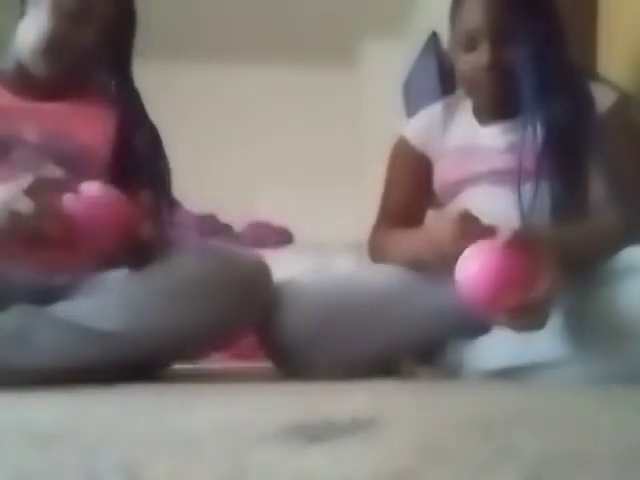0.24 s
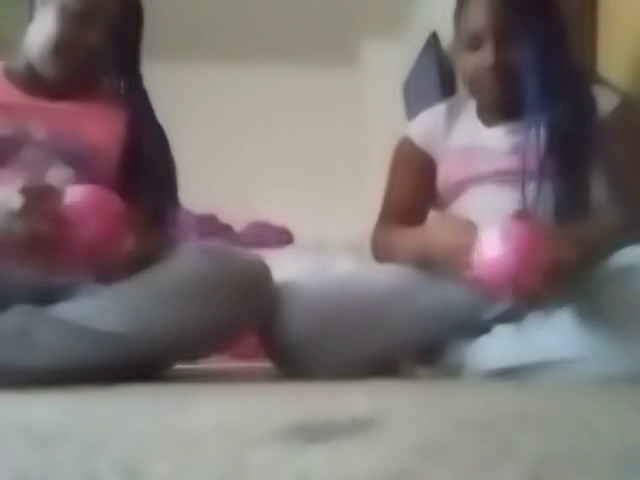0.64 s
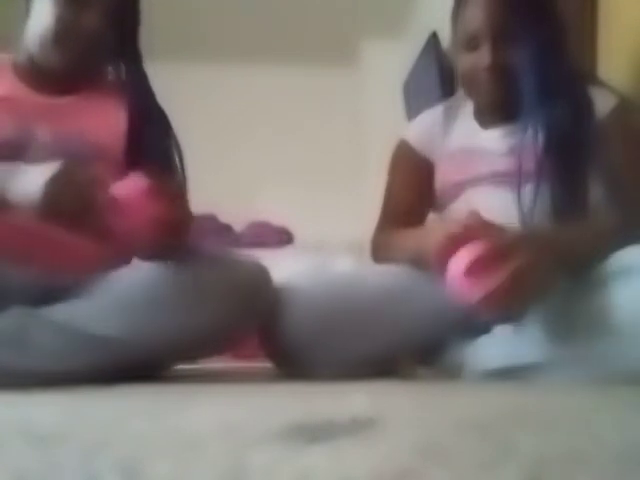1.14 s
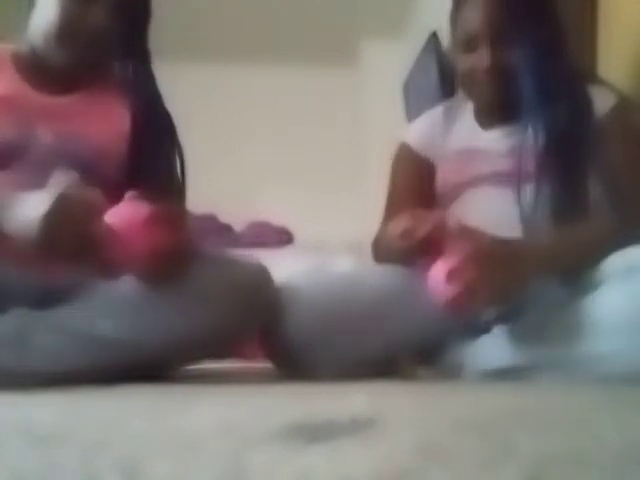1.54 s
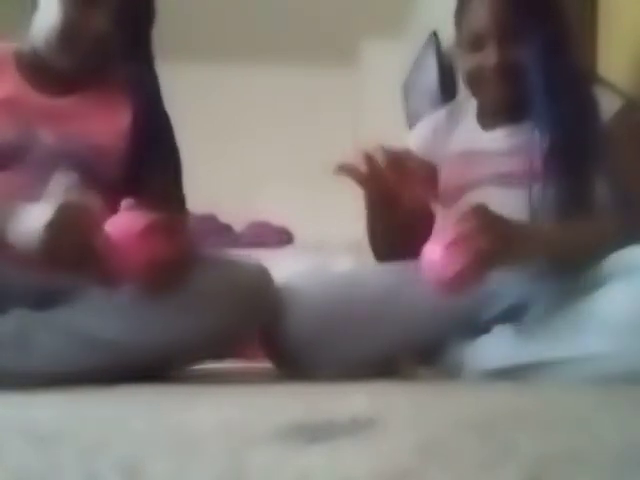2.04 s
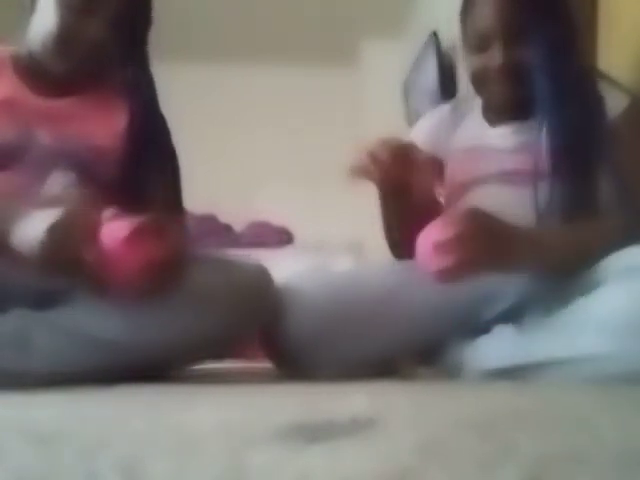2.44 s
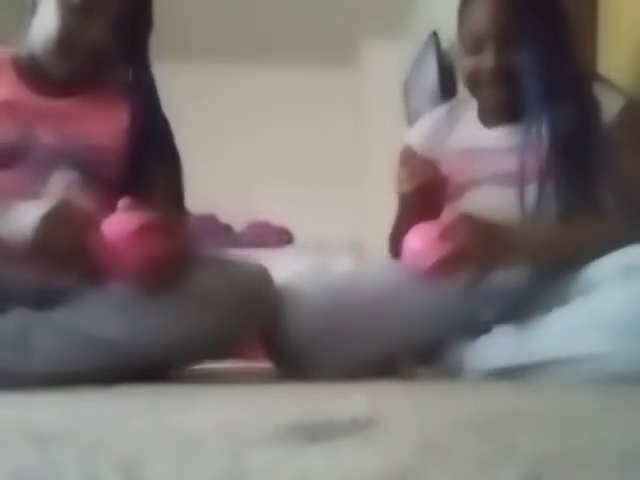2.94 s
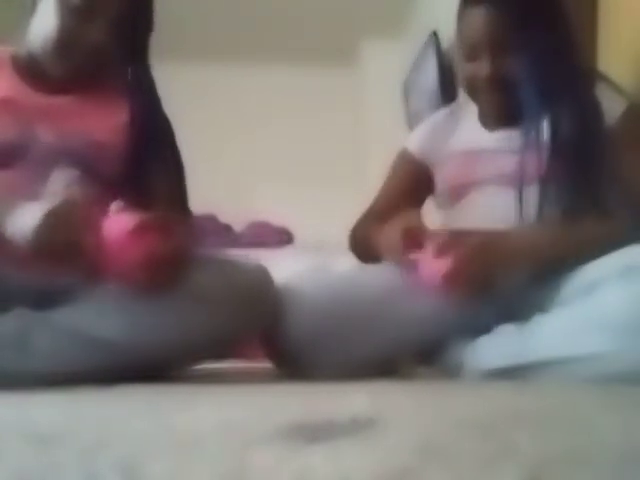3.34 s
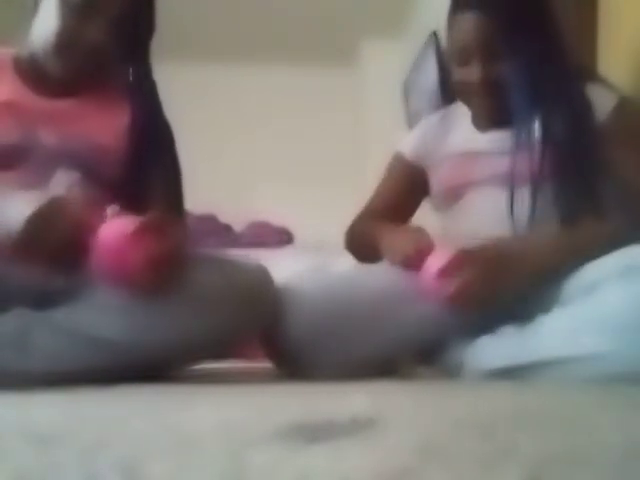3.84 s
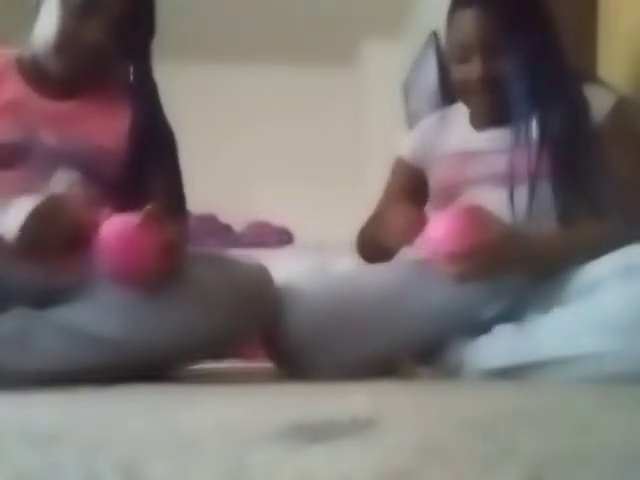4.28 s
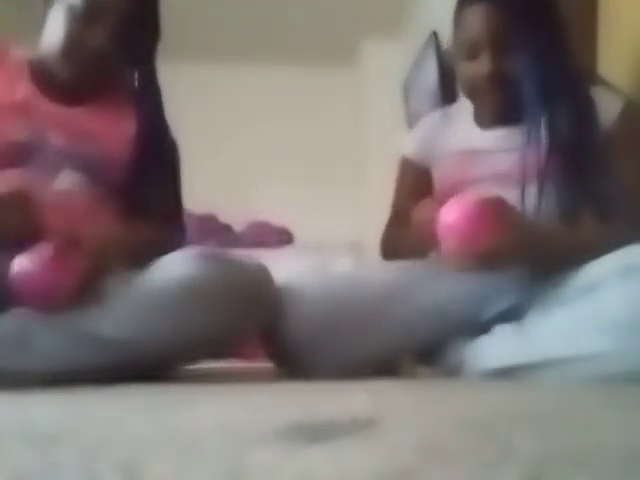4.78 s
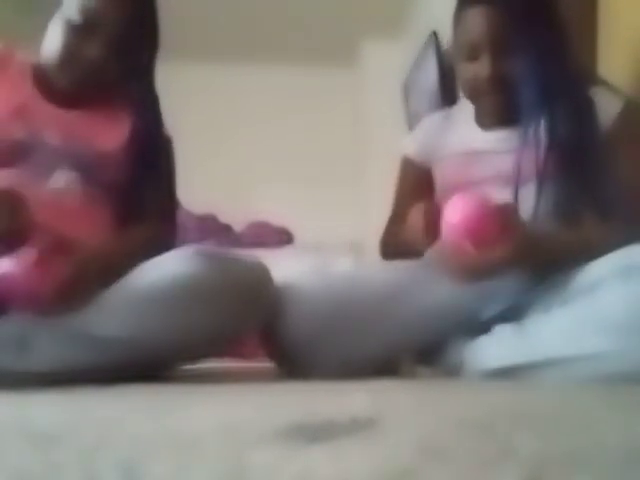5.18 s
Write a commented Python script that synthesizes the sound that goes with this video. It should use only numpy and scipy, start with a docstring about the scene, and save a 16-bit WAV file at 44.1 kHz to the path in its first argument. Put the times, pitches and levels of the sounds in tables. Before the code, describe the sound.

Close handling of stiff plastic film on hollow toy balls, in a small carpeted room with a short diffuse tail. A snap is already ringing at the start; a tight, sharp pair of crackles follows at 0.35-0.4 s. Lighter crinkles and ticks run from 0.6 to 1.2 s, then firmer snaps at 1.4 and 1.6 s and a very bright, hard crack at 1.75 s. It falls almost silent around 2-2.4 s, with only faint high blips. A dull hollow knock with softer crackle lands near 2.58 s, and a lone click at 2.93 s. The densest burst snaps at 3.35-3.5 s, followed by small crinkles through 4.7 s. Strong snaps return at 4.8 and 4.95 s, tapering into light clicks until about 5.4 s. Low rumble and mains hum swell unevenly beneath thin hiss that noise reduction pulls down in the gaps.

```python
"""Peeling film off hollow balls

Hands peel stiff plastic film off hollow toy balls in a small carpeted room, close to a small microphone.
Each crease snaps over in milliseconds: a burst of slips rings ball and film modes and excites the room.
Dull knocks and faint high blips are single damped modes; the creeping film is random ticks. Low rumble and
mains hum come through in surges over a thin hiss; a noise suppressor thins quiet bands above 200 Hz."""
import sys
import numpy as np
from scipy import signal
from scipy.fft import rfft, irfft
from scipy.io import wavfile
from scipy.ndimage import uniform_filter1d

SR = 44100
rng = np.random.default_rng(int(sys.argv[2]) if len(sys.argv) > 2 else 0)


def master_out(mix):
    """Clip the mix to full scale and print it as 16-bit PCM to the path in sys.argv[1]."""
    frames = np.transpose(np.atleast_2d(mix))
    ceiling = np.clip(frames, -1, 1)
    pcm = np.round(ceiling * 32767).astype(np.int16)
    wavfile.write(sys.argv[1], SR, pcm)


N = 238800
LEAD = 4410  # samples computed ahead of time zero, so that an earlier snap still rings
RING_SAMPLES, SLIP_SAMPLES = 2048, 700
SNAP_SAMPLES = RING_SAMPLES + SLIP_SAMPLES - 1

# Modes a snap rings with: five bands from low (the ball) to high; the top two are mostly the microphone port.
# Each row: frequency in Hz, damping in Hz (decay rate over 2 pi), level in dB within its band.
RING_MODES = [
    [(290, 32, -5), (498, 23, 3.5), (655, 160, 15)],
    [(1030, 120, -2), (1195, 100, 8), (1635, 130, 4.5)],
    [(2433, 420, 3), (2905, 130, 4), (3790, 100, 6)],
    [(4320, 300, -6.5), (5266, 620, -2.5), (6125, 906, 5.5), (6640, 1300, -15)],
    [(9710, 1200, 2.5), (11250, 1600, -4.5), (13800, 1500, -5.5)],
]


def amp(db):
    """Level definition: 20 dB is a factor of ten in amplitude."""
    return 10 ** (np.asarray(db) / 20)


def evened(x):
    """Power normalization: scales a signal to rms 1."""
    return x / np.sqrt(np.mean(x ** 2) + 1e-20)


def read(points, hz):
    """Spectral interpolation: reads a (Hz, value) curve along a logarithmic frequency axis."""
    f, value = np.transpose(points)
    return np.interp(np.log(hz + 1), np.log(f + 1), value)


def coloured(points):
    """Spectral shaping: filters white noise to a given spectrum, steady and of rms 1."""
    hz = np.fft.rfftfreq(N, 1 / SR)
    spectrum = rfft(rng.standard_normal(N)) * amp(read(points, hz))
    return evened(irfft(spectrum, N))


def ring(modes, detune):
    """Modal superposition: damped sines whose soft start keeps each band out of its neighbours."""
    t = np.arange(RING_SAMPLES) / SR
    total = np.zeros(RING_SAMPLES)
    for (hz, damping, db), factor in zip(modes, detune):
        envelope = np.sqrt(damping) ** 3 * t * np.exp(-2 * np.pi * damping * t)  # same energy at any damping
        total += amp(db) * envelope * np.sin(2 * np.pi * hz * factor * t)
    return total


def crease_slips(grit_db=9.5):
    """Snap-through buckling: a quick run of tiny slips of uneven size that dies away."""
    decay_ms, decay_spread_db = 3.0972, 4
    t_ms = np.arange(SLIP_SAMPLES) / SR * 1000
    decay_ms = decay_ms * amp(decay_spread_db * rng.standard_normal())
    slips = rng.standard_normal(SLIP_SAMPLES) * amp(grit_db * rng.standard_normal(SLIP_SAMPLES))
    slips *= np.exp(-t_ms / decay_ms)
    slips *= 1 + 0.31 * np.exp(-t_ms / 0.069)
    return slips * np.clip(t_ms / 1.2, 0, 1)  # 1.2 ms onset


def snap(s, energy_db, ball_db, film_db, film_hz, detune_spread=0.049):
    """Source-resonator coupling: slips ring ball, film and treble, each with its own share of the energy.

    Returns the sound toward the microphone and, smooth in colour, the average over all directions."""
    # Treble above 8 kHz in a 0 dB snap. Each row: time in seconds, level in dB against 4-8 kHz.
    treble_share = [(0, -3), (.35, -7.5), (.6, -7), (1.0, -4.5), (1.6, -3.5), (1.74, -9.5), (2.5, -8),
                    (3.4, -4), (3.6, -9.5), (4.2, -7), (4.7, -5.5), (5.0, -8), (5.36, -14.5), (5.39, -2)]
    treble_per_db = 0.02  # dB of treble share gained per dB of snap energy
    film_slope = -12.5  # dB per octave away from the film pitch
    slips = crease_slips()
    film_modes = [(hz, damping, db + film_slope * abs(np.log2(hz / film_hz)))
                  for hz, damping, db in RING_MODES[1] + RING_MODES[2]]
    treble_db = np.interp(s, *np.transpose(treble_share)) + treble_per_db * energy_db
    bands = (RING_MODES[0], film_modes, RING_MODES[3], RING_MODES[4])
    shares_db = (ball_db, film_db, 0, treble_db)
    out = np.zeros((2, SNAP_SAMPLES))
    for k, (modes, share_db) in enumerate(zip(bands, shares_db)):
        body = ring(modes, 1 + detune_spread * rng.standard_normal(len(modes)))
        driven = signal.fftconvolve(slips, body)
        level = amp(energy_db + share_db)
        out[0] += level * driven / np.linalg.norm(driven)
        start = 30 * k  # bands set apart in time
        out[1, start:start + RING_SAMPLES] += level * body / np.linalg.norm(body)
    return out


def film():
    """Linear superposition: all snaps added, as direct sound and as the average over all directions."""
    # One row a snap. Each row: start in seconds, energy in dB at 4-8 kHz, ball ring in dB against it,
    # film ring in dB against it, film pitch in Hz.
    creases = [(-.06, -9, 4, -1.5, 2220), (0.1053, -29, -58, -17.5, 1700), (0.34, -4, -28, -4.5, 1200),
               (0.3495, -0.5, -8.5, -7.5, 1226), (.378, -1.5, -11.5, -8, 2760), (0.3862, -17, 2, 4.5, 2700),
               (0.585, -26.5, -53, 1.5, 2770), (0.6284, -18.5, -42, -4, 1390),
               (0.6784, -11.5, -51, -6.5, 2160), (0.8394, -17.5, -34, -14, 2400),
               (.8547, -15.5, -32, -8.5, 2260), (.8967, -19.5, -42, -6, 2880), (.932, -18, -32, -1.5, 2640),
               (0.9632, -15.5, -35, -4, 2720), (1.0608, -11.5, -47, -10, 2520),
               (1.078, -24, -16, -0.5, 1480), (1.097, -23.5, -27, -0.5, 2060), (1.12, -27, -13, 8.5, 1280),
               (1.14, -54, 15, 23.5, 1990), (1.1895, -33, -12, -1, 1680), (1.2668, -27, -16, -34, 2500),
               (1.301, -35.5, -19, -27, 1314), (1.3406, -26, -45, -32, 1710),
               (1.3974, -3, -60, -10.5, 1993), (1.4271, -2, -7, -4, 1330), (1.507, -49.5, 17, 28.5, 1090),
               (1.5924, -6, -12, -5, 1200), (1.61, -16, -15.5, -7, 2600), (1.6229, -10, -10.5, -6.5, 1600),
               (1.7494, 7, -18.5, -19, 2747), (1.7594, -5.5, -7.5, -11.5, 1200),
               (1.7813, -7, -5.5, -24, 2900), (2.168, -41.5, -20, -13, 2330),
               (2.3773, -31.5, -32.5, -32, 2600), (2.4987, -23.5, -39, -16.5, 1660),
               (2.5134, -27, -22, -15, 2900), (2.5518, -31.5, -13, 0.5, 1204),
               (2.5722, -15.5, -7, -6.5, 1480), (2.5886, -9.5, -8, -12, 1110),
               (2.9282, -9.5, -39, -8.5, 2450), (3.112, -29.5, -22, -18.5, 1600),
               (3.2368, -21, -29.5, 0.5, 2800), (3.2674, -21, -46, -10, 2060), (3.2995, -31, -23, 4, 2536),
               (3.3506, -30, -12, -7, 1300), (3.3576, 3, -17, -15.5, 1900), (3.412, -31.5, 17.5, 9, 1100),
               (3.419, 5, -15.5, -9.5, 1362), (3.4233, -4, -23, -19, 3000), (3.456, -7, -3, -12, 2830),
               (3.4751, 1.5, -11.5, -8.5, 1500), (3.48, -3, -32, -23, 1370), (3.7181, -30.5, -23, 2, 2480),
               (3.8034, -31.5, -35, 10.5, 3070), (3.818, -31.5, -15, 2, 1200),
               (3.828, -23.5, -38, 6.5, 1490), (3.8466, -44.5, -3, 16, 2850), (4.031, -32, 2, -1, 2180),
               (4.0397, -10.5, -19.5, -29, 2900), (4.1137, -20, -15, -14, 2800),
               (4.1454, -12.5, -25, -7.5, 2100), (4.1582, -30.5, -24, 2, 1280),
               (4.1712, -22, -23, -1.5, 1350), (4.2465, -20, -28, -7, 2920),
               (4.3008, -28.5, -21, 1.5, 2850), (4.3264, -12.5, -29, -5.5, 1970),
               (4.3816, -19.5, 3, -0.5, 2270), (4.3925, -9, -10.5, -7.5, 1420),
               (4.5351, -35, -39, 11.5, 1400), (4.5465, -24, -25, 0, 1310), (4.5636, -35, 3, 11.5, 1380),
               (4.633, -14.5, -41, -7.5, 2500), (4.6871, -15, -44, -11, 2930),
               (4.7064, -14.5, -38, -13, 2880), (4.7198, -21, -47, -7, 2980),
               (4.799, 3, -14.5, -12.5, 1990), (4.811, -4.5, -17.5, -12.5, 1430),
               (4.8313, -11.5, -4, -7, 2540), (4.944, 0, -9, -7.5, 1330), (4.985, -12.5, -21, -5.5, 1840),
               (5.1518, -26.5, -17, -11, 1500), (5.1888, -23.5, -50, -33, 1800),
               (5.2542, -27, -5.5, -19.5, 2600), (5.2653, -18, -17.5, -13.5, 2920),
               (5.3496, -36, -50, -30, 2220), (5.3585, -10, -40, -57, 2300),
               (5.3731, -13, -19.5, -20.5, 1880), (5.3857, -14, -17.5, -36, 2600)]
    out = np.zeros((2, N + LEAD + 3000))
    for s, *settings in creases:
        at = max(round(s * SR) + LEAD, 0)
        out[:, at:at + SNAP_SAMPLES] += snap(s, *settings)
    return out[:, :N + LEAD]


def knocks_and_blips():
    """Single-mode resonance: each knock or blip is one softly started, damped sine."""
    # Dull knocks, and faint high blips of hiss-like pitch near 2.1 to 2.2 s.
    # Each row: start in seconds, direct peak level in dB, pitch in Hz.
    short_tones = [(.783, -54, 551), (.854, -59, 665), (1.095, -52, 750), (1.119, -36.5, 663),
                   (1.141, -52, 304), (1.19, -50.5, 760), (1.555, -53.5, 900), (1.576, -46.5, 240),
                   (1.599, -40, 216), (1.626, -46.5, 464), (2.103, -59, 6000), (2.105, -62.5, 5340),
                   (2.167, -65, 2320), (2.179, -57.5, 1805), (2.198, -64, 1720), (2.235, -59.5, 5900),
                   (2.499, -56.5, 484), (2.579, -26, 468), (2.582, -31.5, 262), (2.901, -58, 1100),
                   (2.93, -47, 646), (3.298, -57, 720), (3.422, -32, 300), (3.83, -48, 736),
                   (3.834, -58, 1120), (4.02, -45.5, 242), (4.044, -49.5, 324), (4.076, -53, 303),
                   (4.12, -50, 510), (4.325, -49, 543), (4.521, -52, 600), (5.168, -61, 280),
                   (5.235, -45, 610)]
    damping_hz = 50.4
    out = np.zeros(N + LEAD + RING_SAMPLES)
    for s, db, hz in short_tones:
        tone = ring([(hz, damping_hz, 0)], [1])
        at = round(s * SR) + LEAD
        out[at:at + RING_SAMPLES] += amp(db) * tone / abs(tone).max()
    return out[:N + LEAD]


def rustle(size_db=2.5):
    """Shot noise: faint random ticks of uneven size, coloured like the bright part of a snap."""
    # Film creeping between snaps. Each row: time in seconds, direct level in dB.
    creep_level = [(0.0, -57.5), (0.18, -78.5), (0.41, -82.5), (0.51, -64), (0.96, -63), (1.75, -67),
                   (1.94, -70), (2.2, -94), (2.88, -70), (3.28, -63.5), (3.39, -63.5), (3.84, -65.5),
                   (4.1, -64), (4.22, -64), (4.65, -60), (4.79, -64), (5.2, -62.5), (5.41, -56.5)]
    ticks_per_s = 670
    t = (np.arange(N + LEAD) - LEAD) / SR
    happens = rng.random(len(t)) < ticks_per_s / SR
    ticks = happens * amp(size_db * np.minimum(rng.exponential(1, len(t)), 4))
    ticks *= rng.choice([-1., 1.], len(t))
    ringing = signal.fftconvolve(ticks, ring(RING_MODES[3], np.ones(4)))[:len(t)]
    return amp(np.interp(t, *np.transpose(creep_level))) * evened(ringing)


def room(x, gap_ms=9.7, count=3):
    """Diffuse reverberation alone: dense taps decay by band; tails alternate as the hands move."""
    # Decay of the room. Each row: frequency in Hz, time to fall by 60 dB in seconds.
    decay_times = [(200, 0.14), (530, 0.3), (1400, 0.22), (3700, 0.24), (9700, 0.25), (16000, 0.2)]
    # Strength of the room. Each row: frequency in Hz, reverberant energy in dB against direct.
    reverberant_db = [(200, -5.5), (800, -12), (2500, 2.5), (4200, -9.5), (6300, -13), (11000, -10.5),
                      (15500, -6.5)]
    turn_hz = 3
    t, out = np.arange(len(x)) / SR, np.zeros(len(x))
    for k in range(count):
        taps = rng.choice([-1., 1.], SR // 2)
        hz, frames, z = signal.stft(taps, SR, nperseg=128)
        strength = amp(read(reverberant_db, hz))
        z = z * amp(-60 * frames / read(decay_times, hz)[:, None])
        z *= (strength / np.linalg.norm(z, axis=1))[:, None]
        tail = signal.istft(z, SR, nperseg=128)[1]
        tail_ms = np.arange(len(tail)) / SR * 1000
        tail *= np.clip(tail_ms / gap_ms, 0, 1) ** 2  # reflections build up
        tail *= np.sqrt(np.mean(strength ** 2)) / np.linalg.norm(tail)
        # the squared windows add up to one
        window = np.sqrt(2 / count) * np.cos(2 * np.pi * turn_hz * t + k * np.pi / count)
        out += signal.fftconvolve(x * window, tail)[:len(x)]
    return out


def background():
    """Amplitude modulation of stationary noise: low rumble and hum heard in surges, over a steady hiss."""
    # Surges of the low rumble and hum together. Each row: time in seconds, level in dB ahead of the flutter.
    surge_level = [(0.0, -49.5), (0.32, -58), (0.56, -85), (0.68, -45.5), (1.01, -70.5), (1.52, -77),
                   (1.6, -53.5), (1.75, -65.5), (1.81, -49), (2.08, -69.5), (2.54, -65), (2.58, -49),
                   (2.91, -70), (3.04, -57.5), (3.37, -61), (3.46, -47), (3.63, -73.5), (4.16, -53.5),
                   (4.38, -69), (4.93, -70.5), (4.97, -49.5), (5.12, -73.5), (5.17, -59), (5.41, -62)]
    # Rumble spectrum. Each row: frequency in Hz, relative density in dB per Hz.
    rumble_colour = [(12, -15), (20, -22.5), (40, -13.5), (60, 6.5), (113, 7), (140, 4), (210, -13.5),
                     (260, -29), (340, -60), (570, -120)]
    # Hiss spectrum. Each row: frequency in Hz, relative density in dB per Hz.
    hiss_colour = [(120, -17.5), (250, -10.5), (600, -5), (1500, -9.5), (4300, -15), (5300, -11),
                   (6500, -5.5), (8000, -15.5), (16000, -18.5)]
    hum_hz, hum_db = 119.6, -5  # hum level against the rumble
    flutter_db, hiss_db = 2.63, -61  # rms depth of the flutter; hiss level ahead of the suppressor
    t = np.arange(N) / SR
    hum = amp(hum_db) * np.sqrt(2) * np.sin(2 * np.pi * hum_hz * t)
    flutter = evened(sum(np.sin(2 * np.pi * (f * t + rng.random())) for f in np.geomspace(2.5, 9.0, 12)))
    level_db = np.interp(t, *np.transpose(surge_level)) + flutter_db * flutter
    lows = amp(level_db) * evened(coloured(rumble_colour) + hum)
    return lows + amp(hiss_db) * coloured(hiss_colour)


def suppress(x):
    """Spectral gating: lowers each narrow band near its quiet level; opens at once, closes slowly."""
    shut_db, open_over_db, open_span_db, closing_db_per_s = -14, 6, 2.5, 128.5
    hz, t, z = signal.stft(x, SR, nperseg=512, noverlap=384)
    power = uniform_filter1d(abs(z) ** 2, size=5, axis=0)  # smooth over frequency, then time
    power = uniform_filter1d(power, size=3, axis=1)
    power_db = 10 * np.log10(power + 1e-16)
    quiet_db = np.percentile(power_db, 15, axis=1, keepdims=True)
    over_db = power_db - quiet_db - open_over_db
    gain_db = shut_db * (1 - np.clip(over_db / open_span_db, 0, 1))
    # a running maximum on a tilted axis limits how fast the gain may fall
    closing_db = closing_db_per_s * t
    gain_db = np.maximum.accumulate(gain_db + closing_db, axis=1) - closing_db
    gain_db[hz < 200] = 0  # the lows pass untouched
    return signal.istft(z * amp(gain_db), SR, nperseg=512, noverlap=384)[1][:N]


def scene():
    """Direct and reverberant fields of film, knocks, blips and rustle add to the background."""
    direct, all_round = film() + knocks_and_blips() + rustle()
    foreground = (direct + room(all_round))[LEAD:]
    return (foreground + background())[None]


def record(dry):
    """Band limitation: the noise suppressor, then a linear-phase low-pass filter."""
    edge_hz = 16100
    lowpass = signal.firwin(255, edge_hz, window=("kaiser", 8), fs=SR)
    return signal.oaconvolve(suppress(dry[0])[None], lowpass[None], "same")


dry = scene()
out = record(dry)
master_out(out)
```